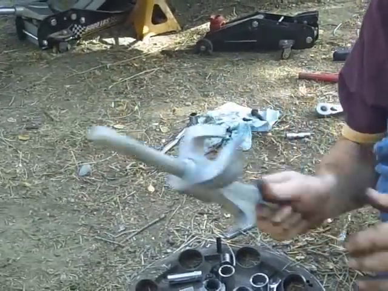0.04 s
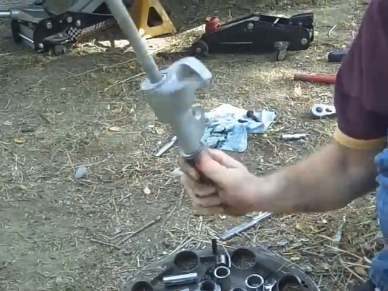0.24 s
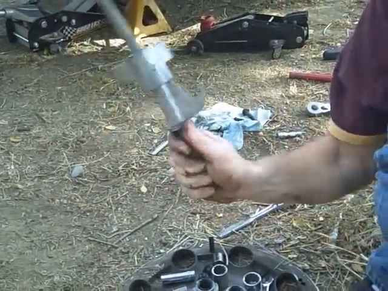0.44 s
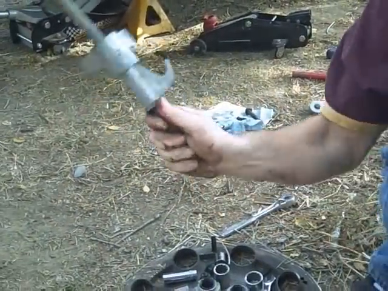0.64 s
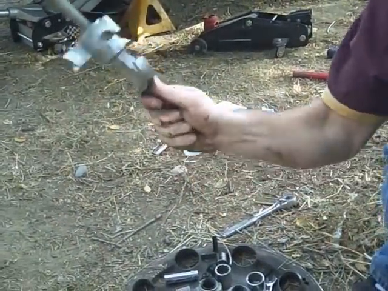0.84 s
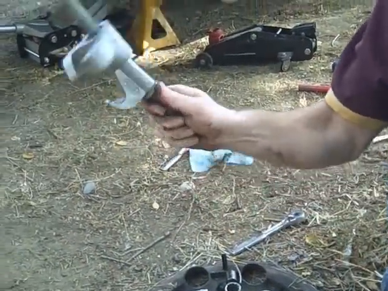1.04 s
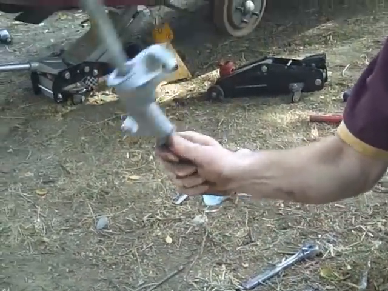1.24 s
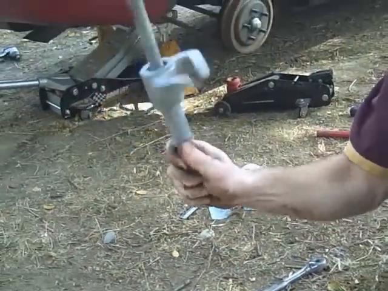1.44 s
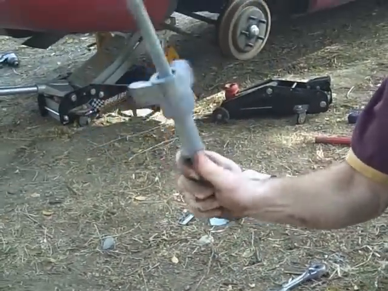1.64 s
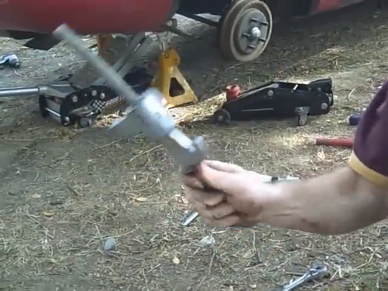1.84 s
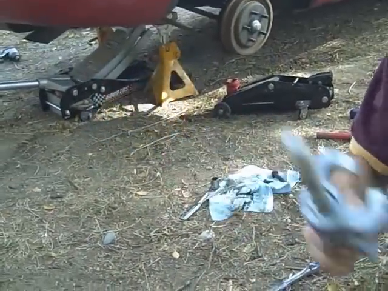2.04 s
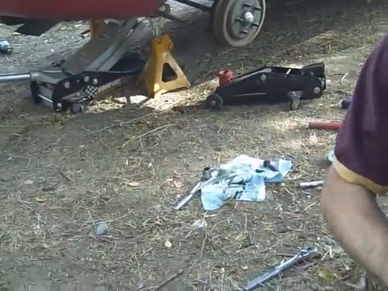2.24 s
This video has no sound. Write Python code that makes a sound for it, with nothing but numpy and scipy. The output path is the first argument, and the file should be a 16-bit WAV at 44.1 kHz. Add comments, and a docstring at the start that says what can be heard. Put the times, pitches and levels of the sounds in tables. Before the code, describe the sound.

A loose steel joint on a car shaft clacks unevenly as it is shaken close by. Light clinks start at 0.2 seconds, and the hardest knock lands at 0.4 with a faint low thump. Thinly ringing clinks follow around 0.8 to 1.2, grow busier from 1.4, and end in a quick rattle around 2 seconds. Soft rubbing, a steady outdoor wash and light wind puffs lie underneath.

```python
"""Sharp, uneven clacks of steel, with a thin, high ring: a car shaft with a loose joint is shaken by hand. Each
knock inside the joint is a quick chatter of contacts that sets the steel's own tones ringing. The hardest knock
also jolts the whole shaft and overloads the small microphone close by. Faint, very low thumps come and go at
set times. Between knocks the parts rub softly. Behind them are a steady outdoor wash of noise, a faint low
drone and light puffs of wind."""
import sys
import numpy as np
from scipy import signal
from scipy.fft import rfft, irfft
from scipy.io import wavfile
from scipy.ndimage import uniform_filter1d

SR = 44100
rng = np.random.default_rng(int(sys.argv[2]) if len(sys.argv) > 2 else 0)


def output_pcm(signal):
    """Save a mono or channel-first signal as 16-bit PCM at the path in sys.argv[1].

    Samples are clipped to [-1, 1] before scaling.
    """
    pcm = np.clip(np.atleast_2d(signal).T, -1, 1) * 32767
    wavfile.write(sys.argv[1], SR, np.round(pcm).astype(np.int16))


N = 101429
TIME, FREQ = np.arange(N) / SR, np.fft.rfftfreq(N, 1 / SR) + 1

# The tones the steel rings at (its modes). Each letter: pitch in Hz, seconds to fade by 60 dB,
# level in dB compared with the knock that grazes it.
STEEL_TONES = {"a": (2960, 0.0056, -10), "b": (3135, 0.059, -14), "c": (5150, 0.18, -22),
               "d": (6700, 0.11, -21.5), "e": (7660, 0.14, -19.5), "f": (8575, 0.16, -25.5),
               "g": (10980, 0.11, -23.5), "h": (11316, 0.1, -32), "i": (11540, 0.13, -23.5)}
# Knocks in the joint. Each row: start in seconds, level in dB, treble tilt in dB per octave,
# chatter fade time in ms, clack pitch in Hz, and the tones it hits squarely. Those are listed by
# letter with their level in dB; "sustain" multiplies how long they ring.
JOINT_KNOCKS = [ (.190, -41, -7, 5, 5500, {}), (0.1991, -36, -1.5, 2.3, 5630, {"d": -38, "sustain": 2}),
                (.2405, -47, 11, 3, 8850, {}), (.274, -33.5, -3.5, 3.7, 7650, {"f": -44}),
                (0.284, -40, -2, 5.8, 2750, {"h": -60}), (0.3077, -36.5, -2.5, 1.2, 2500, {"i": -50}),
                (0.346, -45, 2, 7, 7600, {"e": -35.5}), (0.3708, -38.5, 0, 4.8, 9600, {}),
                (0.3806, -16.5, 8.5, 0.57, 9820, {}), (.3815, -22.5, -1, 0.72, 4700, {}),
                (0.3821, -14, 10, 0.4, 9640, {"c": -48, "e": -45}),
                (0.427, -47, 9, 5, 7700, {"e": -47, "i": -54, "sustain": 2.5}),
                (0.452, -48, 12, 1.4, 9500, {}),
                (0.5127, -35, -2.5, 2.6, 4800, {"f": -43.5, "c": -44, "g": -48}),
                (.556, -43.5, 5, 1, 9800, {}), (0.6268, -41, 19, 2, 7200, {}),
                (.665, -41, -12, 0.68, 4000, {}), (.7479, -38, -9, 1.8, 5150, {"c": -49}),
                (0.8434, -26, -1.5, 2.3, 3420, {"b": -30, "e": -45, "sustain": 0.56}),
                (0.8704, -37, -4.5, 1.2, 6600, {"c": -50}), (.9253, -40, -6, 3.7, 7500, {}),
                (.941, -44.5, -17, 0.92, 3160, {}), (0.9786, -37, 2, 2.2, 7700, {}),
                (0.9813, -29.5, -1, 5, 7400, {"d": -31.5, "e": -34, "f": -36.5, "g": -27.5, "sustain": 0.86}),
                (1.024, -41.5, 9, 7, 5200, {"g": -45}), (1.047, -47.5, 7, 6.5, 3100, {"b": -38}),
                (1.147, -33.5, 2.5, 3.3, 2260, {}), (1.1488, -38, 5, 2.1, 8160, {}),
                (1.1582, -38, -3.5, 5.6, 2240, {"d": -42}), (1.335, -45, 7, 2.5, 6840, {"f": -47.5}),
                (1.4056, -38.5, -2.5, 2, 7350, {}), (1.4077, -36.5, -2.5, 2.2, 2840, {}),
                (1.4125, -41.5, -8, 2, 2800, {}), (1.430, -37, -2.5, 8.2, 7600, {"d": -39}),
                (1.4391, -31, -2, 2.8, 2960, {"i": -35, "e": -33, "sustain": 0.41}),
                (1.456, -40, 4, 0.94, 7600, {}), (1.473, -32, -3.5, 2.1, 2730, {}),
                (1.477, -34.5, -0.5, 4.1, 3120, {"h": -41}), (1.510, -34, 8, 1.6, 6560, {}),
                (1.5586, -29, 3, 1.4, 9740, {"g": -36, "f": -38.5, "c": -43.5}),
                (1.594, -37, -7, 5.1, 2000, {}), (1.6597, -42.5, -12, 1.5, 2560, {}),
                (1.6964, -28.5, 0, 2.3, 5470, {"e": -31, "i": -38, "sustain": 0.63}),
                (1.711, -38.5, -11, 6.8, 5140, {}), (1.7604, -32.5, 0, 2.8, 5200, {}),
                (1.782, -44.5, 18, 5.5, 7950, {}), (1.871, -47.5, 10, 3.7, 7000, {}),
                (1.8826, -33, -4, 1.9, 2890, {}),
                (1.9229, -30.5, 2.5, 6.3, 6760, {"d": -31, "sustain": 0.86}),
                (1.9258, -35, 4.5, 1.7, 3300, {}),
                (1.937, -28.5, 6.5, 4, 8400, {"f": -22.5, "sustain": 0.94}),
                (1.948, -33, -3, 8.7, 7800, {}), (1.963, -27, 9, 0.79, 9570, {"d": -37.5, "h": -34.5}),
                (1.9938, -33, 10.5, 2.5, 10600, {"h": -36.5}), (2.023, -34, -3, 4, 2170, {"b": -33.5}),
                (2.028, -41, -5, 8.8, 3200, {"d": -44}), (2.063, -41, 1, 6.4, 6700, {"d": -42.5})]
# The tone colour of steel hitting steel. Each row: frequency in Hz, level in dB.
CONTACT_COLOUR = [(100, -14), (500, -16.5), (1200, -4), (2200, -0.5), (3200, 1.5), (3900, -4), (5200, 0),
                  (6400, -4.5), (7700, -0.5), (9500, -7), (11400, -9), (12800, -26)]
# How loudly the parts rub. Each row: time in seconds, level in dB.
RUB_LEVEL = [(0, -49), (.15, -52), (.3, -47), (.43, -51), (.6, -54), (.8, -48), (.93, -55.5), (1.03, -48),
             (1.25, -51.5), (1.46, -46), (1.64, -53.5), (1.73, -45.5), (1.83, -51.5), (1.95, -48),
             (2.06, -49), (2.12, -63), (2.3, -58.5)]
# The tone colour of the rubbing. Each row: frequency in Hz, level in dB.
RUB_COLOUR = [(200, -39), (1300, 1), (2300, 6.5), (3200, 0), (4200, -5), (5200, -4), (6400, -4.5),
              (7700, -10), (9500, -8.5), (11500, -13.5), (13000, -8)]
# Gritty scrapes in the busiest rattles. Each row: middle in seconds, level in dB, half length in seconds.
GRITTY_SCRAPES = [(0.286, -53, 0.0042), (1.465, -51, 0.016), (1.961, -44, 0.0068), (2.026, -55, 0.0059)]
# The tone colour of the outdoor wash. Each row: frequency in Hz, level in dB.
OUTDOOR_COLOUR = [(18, -21), (30, -14.5), (81, -9), (121, -7.5), (149, -6), (319, -10), (411, -8),
                  (503, -6.5), (756, -3.5), (880, -1), (950, -0.5), (1460, -3), (1980, -9), (2560, -16),
                  (13000, -30.5)]
# How loud the wash is. Each row: time in seconds, level in dB.
OUTDOOR_LEVEL = [(0, -47), (.4, -46.5), (.6, -46.5), (.85, -45), (1.2, -47.5), (1.6, -48), (2.0, -46.5),
                 (2.3, -47)]
# How loud the low drone is. Each row: time in seconds, level in dB.
DRONE_LEVEL = [(0, -58), (.25, -56), (.5, -72), (.7, -57.5), (1.0, -58), (1.2, -64.5), (2.3, -72.5)]
# Puffs of wind. Each row: middle in seconds, level in dB, half length in seconds, centre pitch in Hz.
WIND_PUFFS = [(0.054, -52, 0.015, 90), (0.177, -52.5, 0.02, 104), (1.266, -53, 0.033, 125),
              (1.44, -55, 0.017, 94.5), (1.953, -52.5, 0.022, 105)]
# Shifts of the signal away from zero, heard as faint, very low thumps. # Each row: start in seconds, level in
# dB, rise in seconds.
LOW_SHIFTS = [(0.379, -36, 0.0011), (.75, -36.5, 0.029), (1.558, -45, 0.0033), (1.9, -46.5, 0.011)]
# How the microphone dulls the treble. Each row: frequency in Hz, gain in dB.
MIC_DROOP = [(20, 0), (11500, -1), (12700, -2.5)]

GRAZED_SUSTAIN = 0.65  # a grazed tone rings for a shorter time, as the parts are still touching


def knocks(ring_limit_db=-29, spread_db=3):
    """Each knock clacks, rings the tones it hits squarely, and grazes the others by uneven amounts."""
    out = np.zeros(N)
    for start, db, tilt_db, decay_ms, pitch_hz, struck in JOINT_KNOCKS:
        add(out, start, amp(db) * clack(db, tilt_db, decay_ms, pitch_hz))
        for name, (hz, ring_s, tone_db) in STEEL_TONES.items():
            # Past the limit, a harder knock presses the parts together and rings no louder.
            grazed_db = min(db, ring_limit_db) + tone_db + spread_db * rng.standard_normal()
            sustain = struck.get("sustain", 1) if name in struck else GRAZED_SUSTAIN
            add(out, start, amp(struck.get(name, grazed_db)) * ring(hz, ring_s * sustain))
    return out


def clack(blow_db, tilt_db, decay_ms, pitch_hz, size=2048):
    """One impact and its dying chatter, with a tone colour set by where the parts meet."""
    ordinary_db, peak_width_hz, tilt_from_hz, even_band_hz = -35, 420, 2200, 920
    t, hz = TIME[:size], np.fft.rfftfreq(size, 1 / SR) + 1
    noise, roughness = rng.standard_normal((2, size))
    chatter = unit(noise * np.exp(0.67 * roughness)) * np.exp(-t * 1000 / decay_ms)
    chatter[0] += 2.85  # the first touch
    force = rfft(chatter)
    # The chatter's chance bumps in tone colour, taken out below to spread its energy evenly.
    bumps_db = 10 * np.log10(uniform_filter1d(abs(force) ** 2, int(even_band_hz * size / SR)))
    height_db = 8.5 + 0.25 * (blow_db - ordinary_db)  # a harder blow has a clearer pitch
    peak_db = height_db * np.exp(-.5 * ((hz - pitch_hz) / peak_width_hz) ** 2)
    treble_db = tilt_db * np.log2(np.maximum(hz, tilt_from_hz))
    shape_db = colour(CONTACT_COLOUR, hz) + treble_db + peak_db - bumps_db
    sound = irfft(force * causal(shape_db, size))
    return sound / np.sqrt(np.sum(sound ** 2) / 200)  # every clack leaves here with the same energy


def ring(hz, ring_s, rise_s=0.0014, wander_hz=25.4, flutter_db=3, flutter_onset_s=0.02):
    """One dying tone of the steel, wavering in pitch and level as the loose parts shift."""
    t = TIME[:SR // 2]
    cycles = np.cumsum(hz + wander_hz * wobble(len(t))) / SR + rng.random()
    flutter = uniform_filter1d(wobble(len(t)), 100) * np.minimum(t / flutter_onset_s, 1)
    rise = 1 - np.exp(-t / rise_s)
    fade = amp(flutter_db * flutter - 60 * t / ring_s)
    return rise * fade * np.sin(2 * np.pi * cycles)


def thud(start_s=0.3806, db=-12.5, hz=750):
    """On the hardest knock the joint hits its stop and jolts the shaft: one push and its rebound."""
    out = np.zeros(N)
    angle = 2 * np.pi * hz * TIME
    add(out, start_s, amp(db) * (1 - angle) * np.exp(-angle))
    return out


def rubbing(slips_per_s=900, slip_s=0.005, spread_db=3.3, ring_db=-10):
    """Tiny slips of greased steel overlap, swell into scrapes and keep the tones faintly ringing."""
    strengths = amp(spread_db * np.minimum(rng.exponential(1, N), 3))
    slips = strengths * (rng.random(N) < slips_per_s / SR)
    pressure = np.sqrt(abs(signal.fftconvolve(slips ** 2, np.hanning(int(slip_s * SR)), "same")))
    rub = pressure * rng.standard_normal(N)
    grit = shaped(rub, amp(colour(RUB_COLOUR, FREQ)))
    tones = sum(amp(db) * ring(hz, ring_s * GRAZED_SUSTAIN) for hz, ring_s, db in STEEL_TONES.values())
    ringing = amp(ring_db) * unit(signal.fftconvolve(rub, tones)[:N])
    scrapes = sum(amp(db) * swell(middle, half_s) for middle, db, half_s in GRITTY_SCRAPES)
    return scrapes * grit + level(RUB_LEVEL) * (grit + ringing)


def echoes(sound, db=-27, fade_s=0.086, delay_s=0.0037):
    """Short, weak echoes bounce off the ground and the car."""
    t = TIME[:SR // 4]
    bounces = rng.standard_normal(len(t)) * amp(-60 * t / fade_s) * (t > delay_s)
    return amp(db) * signal.fftconvolve(sound, bounces / np.linalg.norm(bounces))[:N]


def outdoors(drone_hz=256):
    """A steady, distant wash of wide noise, and a narrow band of noise heard as a faint low drone."""
    wash = shaped(rng.standard_normal(N), amp(colour(OUTDOOR_COLOUR, FREQ)))
    drone = noise_band(drone_hz, octaves=0.26)
    return level(OUTDOOR_LEVEL) * wash + level(DRONE_LEVEL) * drone


def wind():
    """Moving air makes soft, low puffs at the microphone."""
    out = np.zeros(N)
    for middle, db, half_s, hz in WIND_PUFFS:
        out += amp(db) * swell(middle, half_s) * noise_band(hz, octaves=0.8)
    return out


def low_shifts(fade_s=0.087):
    """Faint, very low thumps and slow drifts, at set times."""
    out = np.zeros(N)
    for start, db, rise_s in LOW_SHIFTS:
        add(out, start, -amp(db) * (1 - np.exp(-TIME / rise_s)) * np.exp(-TIME / fade_s))
    return out


def amp(db):
    """Turns decibels into a number to multiply a sound by."""
    return 10 ** (np.asarray(db) / 20)


def unit(x):
    """Scales a signal to an average strength (rms) of 1."""
    return x / np.sqrt(np.mean(x ** 2) + 1e-20)


def colour(points, hz):
    """Looks up a tone colour table at the given frequencies, in dB."""
    table_hz, db = np.transpose(points)
    return np.interp(np.log(hz), np.log(table_hz), db)


def level(points):
    """Turns a table of times and levels into a gain for every sample."""
    return amp(np.interp(TIME, *np.transpose(points)))


def swell(middle_s, half_s):
    """A smooth rise to 1 and back down."""
    return np.exp(-.5 * ((TIME - middle_s) / half_s) ** 2)


def wobble(count, smooth_s=0.0039):
    """A smoothed random curve of strength 1."""
    return unit(uniform_filter1d(rng.standard_normal(count), int(smooth_s * SR)))


def shaped(x, gain):
    """Gives each frequency of a track its own gain, then scales the track to strength 1."""
    return unit(irfft(rfft(x) * gain, N))


def noise_band(centre_hz, octaves):
    """Noise that is strongest at one pitch and falls away on both sides."""
    return shaped(rng.standard_normal(N), np.exp(-.5 * (np.log2(FREQ / centre_hz) / octaves) ** 2))


def causal(db, size):
    """Turns a dB curve into a filter that makes no sound before the hit (minimum phase)."""
    cepstrum = irfft(np.log(amp(db)))
    cepstrum[1:size // 2] *= 2
    cepstrum[size // 2 + 1:] = 0
    return np.exp(rfft(cepstrum))


def add(mix, start_s, sound):
    """Adds a sound to the mix at its start time."""
    part = mix[max(round(start_s * SR), 0):][:len(sound)]
    part += sound[:len(part)]


def scene():
    """The shaken joint and its echoes in the open air, as one channel."""
    steel = knocks() + thud() + rubbing()
    return (steel + echoes(steel) + outdoors() + wind() + low_shifts())[None]


def record(dry, ceiling_db=-13, cutoff_hz=12700):
    """The microphone squashes the hardest knock, dulls the treble and cuts off the very top."""
    squashed = dry / (1 + (dry / amp(ceiling_db)) ** 4) ** .25
    dulled = irfft(rfft(squashed) * amp(colour(MIC_DROOP, FREQ)), N)
    low_pass = signal.firwin(255, cutoff_hz, window=("kaiser", 7), fs=SR)
    return signal.oaconvolve(dulled, low_pass[None], "same")


dry = scene()
out = record(dry)
output_pcm(out)
```